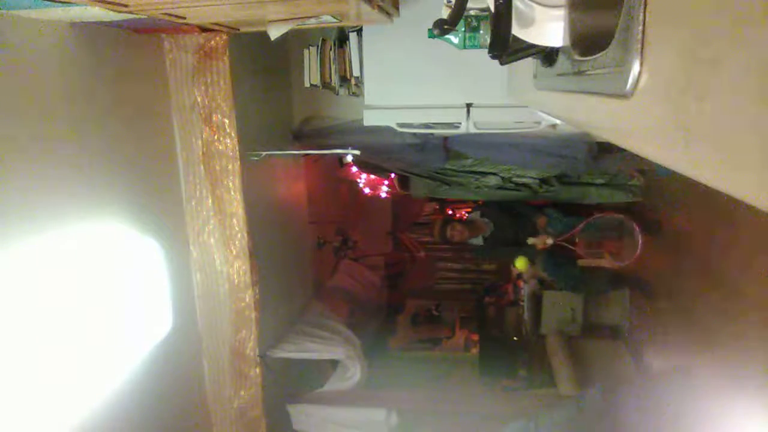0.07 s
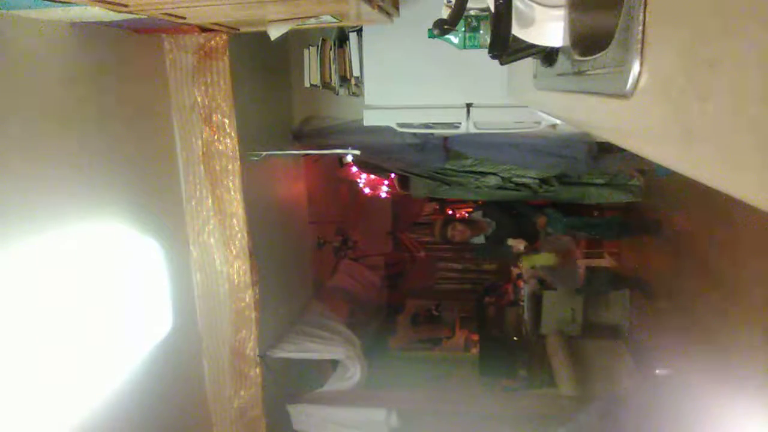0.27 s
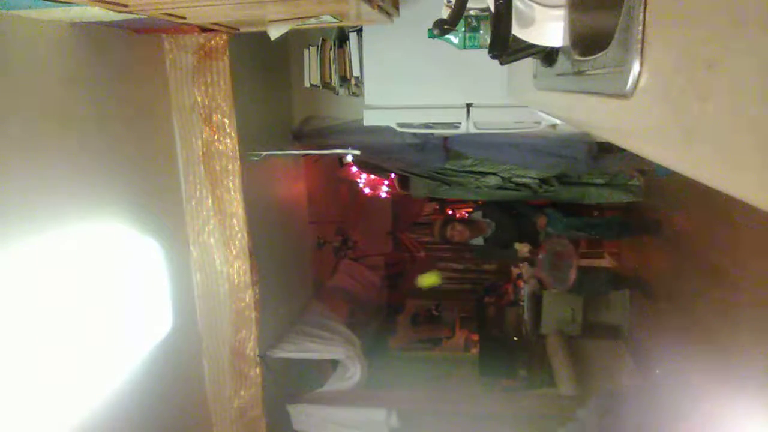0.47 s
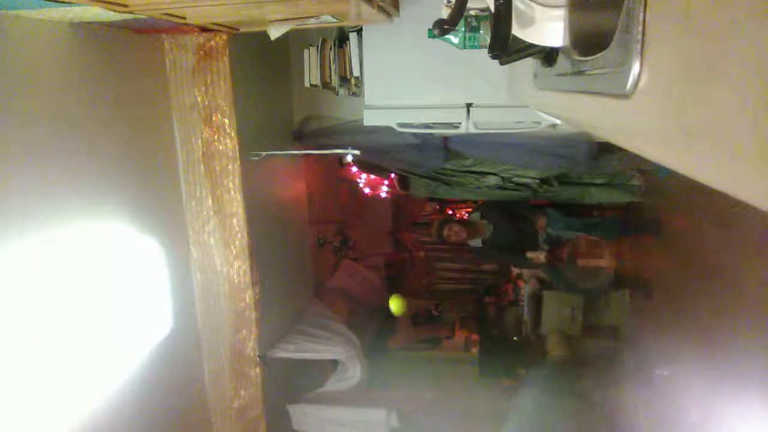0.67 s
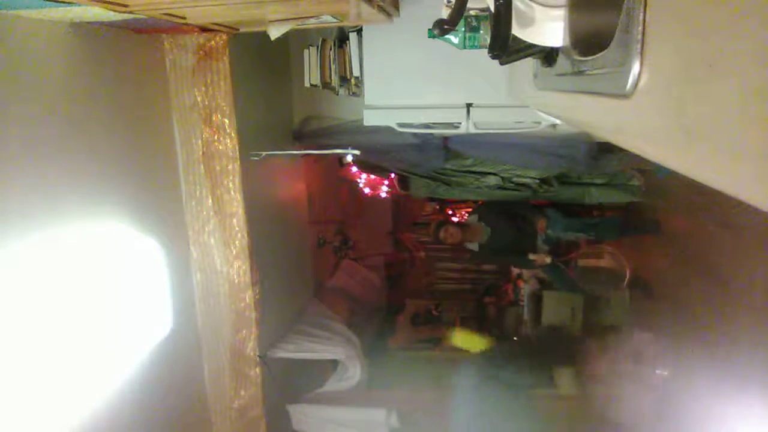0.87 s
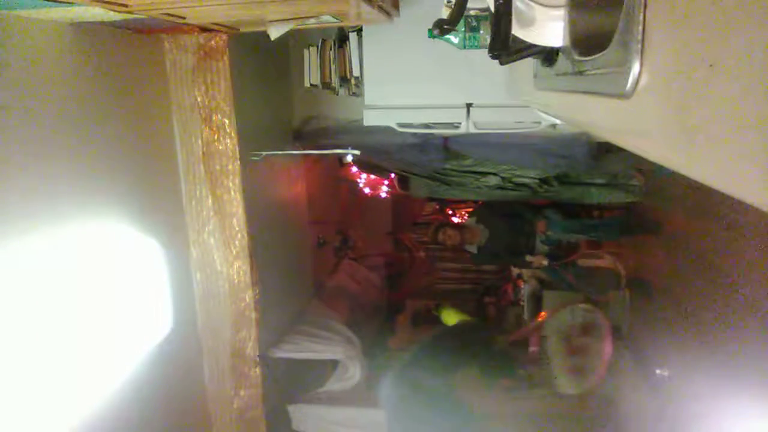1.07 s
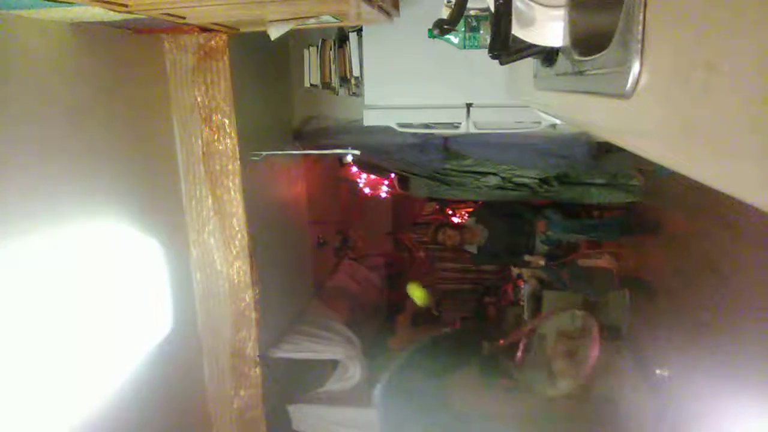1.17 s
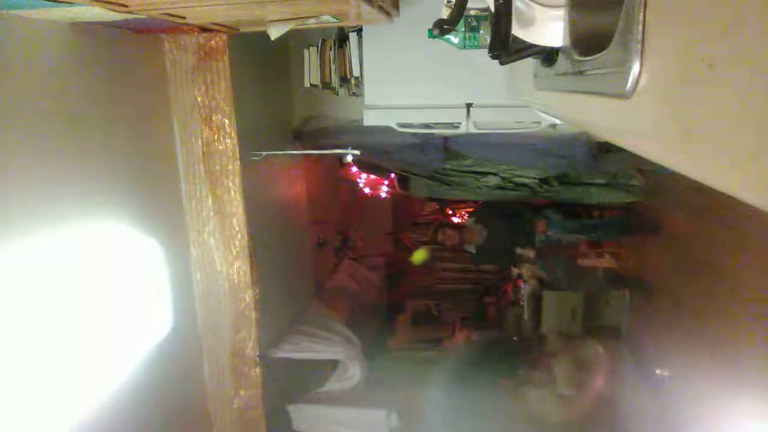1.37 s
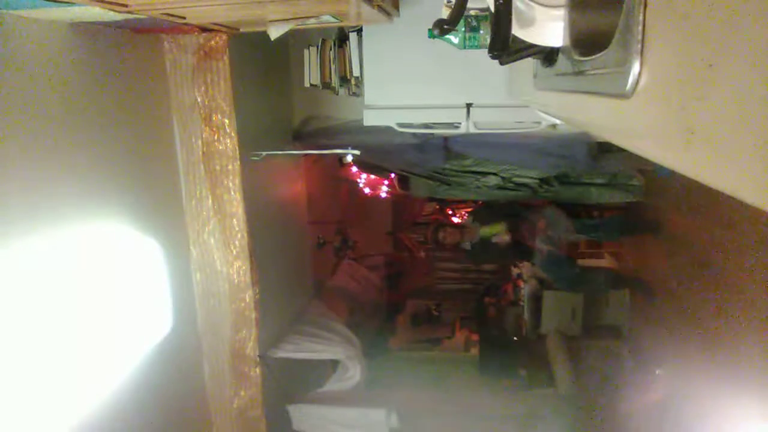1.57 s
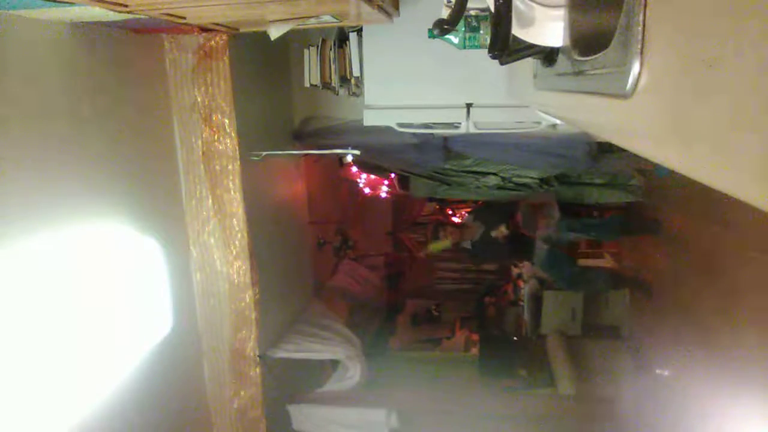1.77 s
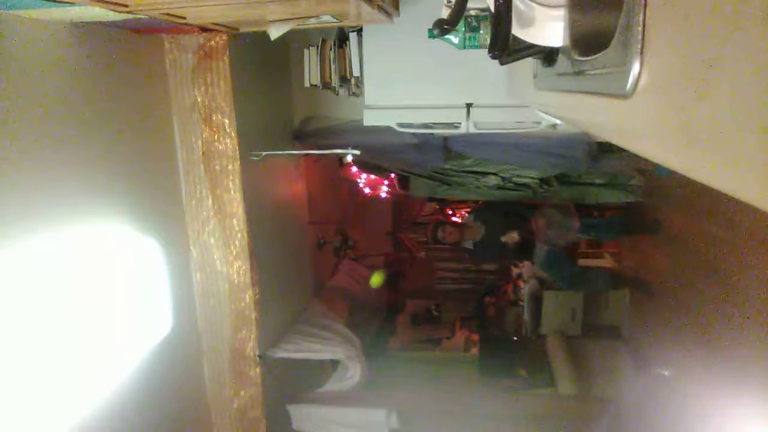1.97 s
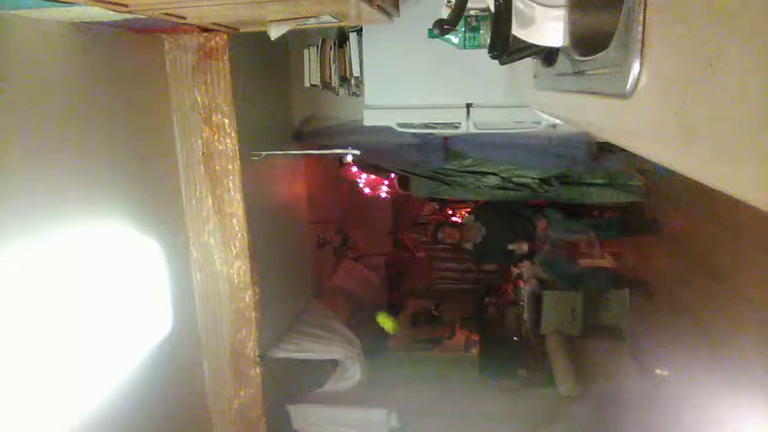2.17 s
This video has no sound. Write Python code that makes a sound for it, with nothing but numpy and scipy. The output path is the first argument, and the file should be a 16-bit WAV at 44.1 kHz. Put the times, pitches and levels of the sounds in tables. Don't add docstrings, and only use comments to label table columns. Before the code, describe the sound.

A tennis ball is played gently indoors: a soft double-touch bounce at 0.33 s, gritty shoe scuffs around 0.75 s, and a short hollow racket pock at 1.04 s. More scuffs come near 1.48 s. At 1.65 s the ball clips small metal, which rattles and rings high; it bounces at 1.71 s amid dull floor thumps until about 2.15 s. Quiet hum and airy hiss continue, with short room echoes.

```python
import sys
import numpy as np
from scipy import signal
from scipy.fft import rfft, irfft
from scipy.io import wavfile
from scipy.ndimage import uniform_filter1d

SR = 44100
rng = np.random.default_rng(int(sys.argv[2]) if len(sys.argv) > 2 else 0)


def unload_audio(sound):
    columns = np.transpose(np.atleast_2d(sound))
    steps = np.round(np.clip(columns, -1, 1) * 32767)
    wavfile.write(sys.argv[1], SR, steps.astype(np.int16))


def nominal_scale(level):
    x = np.asarray(level, float) / 20
    return 10 ** x


N = 97108

# (time [s], crack level [dB])
CLINKS = [
    (1.648, -40.5),
    (1.6555, -59.5),
    (1.659, -58.5),
    (1.669, -58),
    (1.688, -67),
    (1.712, -66.5),
]
THUMP_RISE_S = 0.017


def evened(x):
    return x / np.sqrt(np.mean(x ** 2) + 1e-20)


def read(points, hz):
    f, value = np.transpose(points)
    return np.interp(np.log(hz + 1), np.log(f + 1), value)


def add(mix, s, sound):
    part = mix[:, round(s * SR):][:, :sound.shape[1]]
    part += sound[:, :part.shape[1]]


def panned(db):
    return nominal_scale(np.array([[db], [-db]]) / 2)


def click(shape, tilt_db=0):
    hz = abs(np.fft.fftfreq(4096, 1 / SR))
    db = read(shape, hz) + tilt_db * np.log2((hz + 50) / 1200)
    log_gain = np.log(nominal_scale(np.maximum(db, -100)))
    phase = -signal.hilbert(log_gain).imag
    x = np.fft.ifft(np.exp(log_gain + 1j * phase)).real[:2048]
    return x / np.linalg.norm(x)


def ring(modes, size=16000):
    t = np.arange(size) / SR
    return sum(nominal_scale(db - 60 * t / t60) * np.sin(2 * np.pi * hz * t) for hz, db, t60 in modes)


def band(lo_hz, hi_hz, size):
    sos = signal.butter(3, [lo_hz, hi_hz], "band", fs=SR, output="sos")
    return evened(signal.sosfilt(sos, rng.standard_normal((2, size))))


def stereo_pair(left, other, same, lean):
    return np.array([lean * left, (same * left + np.sqrt(1 - same ** 2) * other) / lean])


def room(x, pan_db, dry_db, blur_s=0):
    # (frequency [Hz], likeness)
    port_same = [(130, .95), (300, .85), (600, .8), (1050, .55), (1650, .15), (2900, -.25), (6400, 0),
                 (14000, .1)]
    # (frequency [Hz], level [dB])
    port_lean = [(60, -3), (250, 3.5), (1000, 3), (2500, 0), (4700, 2), (7500, -1), (14000, -4)]
    # (frequency [Hz], t60 [s])
    decay = [(250, 0.26), (1000, 0.17), (3000, 0.16), (8000, 0.21), (13000, 0.17)]
    fill_s, hold_s = 0.003, 0.016
    shape = (2, SR // 2)
    build = np.minimum(np.arange(SR // 2) / SR / fill_s, 1)
    taps = rng.choice([-1., 1.], shape) * (rng.random(shape) < 0.1) * build
    hz, t, z = signal.stft(taps, SR, nperseg=256)
    same = np.clip(read(port_same, hz), -1, 1)[:, None]
    z = stereo_pair(z[0], z[1], same, nominal_scale(read(port_lean, hz) / 2)[:, None])
    z = z * nominal_scale(-60 * np.maximum(t - hold_s, 0) / read(decay, hz)[:, None])
    tail = signal.istft(z, SR, nperseg=256)[1]
    tail = tail / np.linalg.norm(tail) * np.sqrt(2)
    blur = np.hanning(round(blur_s * SR) + 3)
    tail[:, :len(blur)] += nominal_scale(dry_db) * blur / blur.sum()
    return signal.fftconvolve(x[None], tail, axes=1) * panned(pan_db)


def pock(shape, shell_db, db, dry_db, pan_db, tilt_db):
    # (frequency [Hz], level [dB], t60 [s])
    shell = [(858, -24.5, 0.034), (981, -28.5, 0.19), (1126, -10.5, 0.072), (1440, -12, 0.092),
             (1540, -3.5, .07), (1618, -8.5, 0.094), (2106, -19, 0.3)]
    x = click(shape, tilt_db) + nominal_scale(shell_db) * ring(shell, size=2048)
    return nominal_scale(db + 32.5) * room(x, pan_db, dry_db, blur_s=0.00015)


def racket_knock(*row):
    # (frequency [Hz], density [dB per Hz])
    ball = [(150, -18.5), (300, -10.5), (900, 1.5), (1550, -6), (2300, -8), (4000, -19.5), (8500, -34),
            (11500, -49.5)]
    return pock(ball, -25, *row)


def ball_landing(*row):
    # (frequency [Hz], density [dB per Hz])
    landing = [(200, -18.5), (450, -8), (620, 3), (1100, 2), (1700, -2.5), (2200, -14), (4500, -27),
               (14000, -46.5)]
    return pock(landing, -49, *row)


def fitting_cracks():
    # (frequency [Hz], density [dB per Hz])
    crack = [(300, -33.5), (1300, -25), (2100, -9.5), (3000, -13), (4100, -8), (7000, -14.5), (10300, -9.5),
             (14400, -25)]
    # (frequency [Hz], width [Hz], depth [dB])
    hollows = [(2964, 310, -5), (5960, 380, -10.5), (8350, 210, -14), (14500, 250, -18)]
    hits = np.zeros(4000)
    for s, db in CLINKS:
        hits[round((s - CLINKS[0][0]) * SR)] = nominal_scale(db + 37.5)
    hz = np.geomspace(200, 16000, num=400)
    colour = read(crack, hz)
    for f, width_hz, db in hollows:
        colour += db * np.exp(-((hz - f) / width_hz) ** 2)
    return room(signal.fftconvolve(hits, click(np.transpose([hz, colour]))), 0, -22)


def fitting_ring():
    metal_hz = [2180, 3761, 3955, 7798, 9283, 9353, 9468, 9521, 9610, 9841, 10247, 10430, 10570, 10950,
                11230, 13126]
    # (level [dB], t60 [s], left-right [dB], bend [1 dies evenly, 2 holds then dies ever faster])
    modes = [(-18, .11, 0, 1), (-16, .12, 4, 1), (-17, .1, 4, 1), (-27, .2, 0, 1), (-15, .3, -2, 1),
             (-8.5, .27, -2, 1.35), (-17, .18, -2, 2), (-4, .215, -1, 2), (-20, .17, -2, 2),
             (-8, .16, -4, 1.5), (-9, .09, -10, 1), (-9, .1, -10, 1), (-15, .1, -9, 1), (-17, .13, -9, 1),
             (-22, .06, -6, 1), (-25, .13, -3, 1)]
    rise_s = [
        [.014],
        [.005],
    ]
    fizz_hz = (12270, 14300)
    ring_db, wet_db, fizz_db, fizz_s = -27, -13, -76, 0.37
    t = np.arange(16000) / SR
    rise, out = 1 - np.exp(-t / np.array(rise_s)), np.zeros((2, len(t)))
    for hz, (db, t60, pan_db, bend) in zip(metal_hz, modes):
        lead = 1.55 + rng.standard_normal() / 2
        turn = 2 * np.pi * rng.random() + np.array([[lead], [0]])
        level = nominal_scale(ring_db + db - 60 * (t / t60) ** bend) * panned(pan_db)
        out += level * rise * np.sin(2 * np.pi * hz * t + turn)
    fizz = nominal_scale(fizz_db) * band(*fizz_hz, len(t)) * rise * np.clip((fizz_s - t) / 0.14, 0, 1)
    return out + fizz + nominal_scale(wet_db) * room(out.mean(0), -4, -40)[:, :len(t)]


def scuff(swell_s, swell_db, snap_db, pan_db):
    # (frequency [Hz], density [dB per Hz])
    sole_shape = [(1800, -23.5), (3300, -3.5), (4500, -14), (5500, -3.5), (7200, 1.5), (8600, -4.5),
                  (10500, -6.5), (14300, -18.5)]
    shade_hz = (8000, 10500)
    grit_per_s, grit_db, grit_dry_db = 9000, 2.5, -14
    snap_s, snap_wet_db = 0.0069, -8.5
    u = np.linspace(0, 1, round(swell_s * SR))
    grit, spread, burst = rng.standard_normal((3, len(u)))
    sparse = rng.random(len(u)) < grit_per_s / SR
    slide = nominal_scale(swell_db + 15) * u * grit * nominal_scale(grit_db * abs(spread)) * sparse
    snap_rise = np.clip(1 - (1 - u) * swell_s / snap_s, 0, 1)
    snap = nominal_scale(snap_db + snap_wet_db + 9.5) * burst * snap_rise
    sole = click(sole_shape)
    x = room(signal.fftconvolve(slide, sole), 0, grit_dry_db)
    x = x + room(signal.fftconvolve(snap, sole), 0, -snap_wet_db)
    treble = np.interp(np.fft.rfftfreq(x.shape[1], 1 / SR), shade_hz, [0, 1])
    return irfft(rfft(x) * nominal_scale(np.array([[pan_db], [-pan_db]]) / 2 * treble), x.shape[1])


def soft_push(size):
    return np.sin(np.pi / 2 * np.minimum(np.arange(size) / SR / THUMP_RISE_S, 1)) ** 2


def thump(boom_db, board_db, creak_db, share):
    # (frequency [Hz], level [dB], t60 [s])
    boom = [(54, -1, 0.53)]
    # (frequency [Hz], level [dB], t60 [s])
    board = [(104.7, 3, 0.31), (121.6, 3, 0.18)]
    # (frequency [Hz], level [dB], t60 [s])
    creak = [(223, 5, 0.095), (300, 7.5, 0.11), (429, -3, 0.1)]
    x = 0
    for db, modes in ((boom_db, boom), (board_db, board)):
        x = x + nominal_scale(db) * ring([(hz, d, t60 * share) for hz, d, t60 in modes])
    lean = panned(-4.5)
    return soft_push(len(x)) * (x * lean + nominal_scale(creak_db) * ring(creak) / lean)


def tock(hz, db, t60):
    x = ring([(hz, db, t60)])
    return x * soft_push(len(x)) * panned(3)


def steady(shape, db, patchy_db, size):
    # (frequency [Hz], left-right likeness)
    likeness = [(60, 1), (230, 0.93), (920, 0.64), (3580, 0.023), (14000, 0.017)]
    # (frequency [Hz], left-right level [dB])
    side = [(60, 2.5), (230, -1), (920, 2.5), (3580, 0), (14000, -3.5)]
    frames, hz = 4 * N // size + 5, np.fft.rfftfreq(size, 1 / SR)
    a, b, c, d, patches = rng.standard_normal((frames, len(hz), 5)).T
    patches = uniform_filter1d(uniform_filter1d(patches, size=12, axis=0), size=8, axis=1)
    same = np.clip(read(likeness, hz), -1, 1)[:, None]
    z = stereo_pair(a + 1j * b, c + 1j * d, same, nominal_scale(read(side, hz) / 2)[:, None])
    z = z * nominal_scale(read(shape, hz)[:, None] + patchy_db * evened(patches))
    return nominal_scale(db) * evened(signal.istft(z, nperseg=size, noverlap=3 * size // 4)[1][:, :N])


def house_hum():
    # (frequency [Hz], density [dB per Hz])
    hum = [(30, -30), (54, 9.5), (78, -29), (115, 1), (160, -20), (300, -17.5), (450, -17.5), (700, -58.5)]
    return steady(hum, -66, patchy_db=4.5, size=2048)


def room_air():
    # (frequency [Hz], density [dB per Hz])
    air = [(180, -35.5), (300, -2), (347, -32.5), (488, -6), (622, -4.5), (875, -2), (949, -5), (1650, -12),
           (14500, -28.5)]
    return steady(air, -73, patchy_db=1.5, size=1024)


def appliance_whistle():
    # (frequency [Hz], half width [Hz], level [dB], start [s], end [s])
    whistle = (4698, 150, -86, -6, -3.5)
    hz, width_hz, db, start, end = whistle
    t = np.arange(N) / SR
    fade = np.clip(np.minimum(t - start, end - t) / 0.064, 0, 1)
    return nominal_scale(db) * band(hz - width_hz, hz + width_hz, N) * fade


def scene():
    # (time [s], level [dB], direct [dB], left-right [dB], brightness [dB per octave])
    knocks = [
        (1.040, -48.5, -14, 6.5, 0.5),
        (1.0432, -42.5, -8, -2.5, 3),
    ]
    # (time [s], level [dB], direct [dB], left-right [dB], brightness [dB per octave])
    bounces = [
        (.329, -51.5, -14.5, -3, 0.7),
        (.347, -56, 0, 3.5, 2.5),
        (1.713, -47.5, -15.5, -0.5, 4.5),
        (1.732, -52, -14, 6.5, 1.9),
    ]
    # (snap time [s], swell [s], swell level [dB], snap level [dB], treble left-right [dB])
    scuffs = [
        (0.738, 0.0062, -73, -79, -13),
        (.767, 0.027, -66.5, -64.5, -9.5),
        (0.884, 0.013, -109, -85, -27),
        (1.273, 0.011, -103, -87, -12),
        (1.462, 0.0094, -74.5, -86, -21),
        (1.482, 0.015, -80.5, -71.5, -14.5),
        (1.489, 0.04, -74, -69.5, -7),
    ]
    # (time [s], boom [dB], board [dB], creak [dB], share of free ring time)
    thumps = [(0.224, -76, -64, -70, 1), (0.29, -69, -72, -60.5, .6), (0.305, -80, -77, -54.5, 0.5),
              (0.389, -74, -60.5, -67, .8), (0.54, -71, -65, -62.5, .8), (0.629, -91, -55, -65.5, 0.39),
              (0.647, -79, -61, -81, 0.34), (0.698, -97, -58, -65.5, 0.61), (0.714, -84, -57.5, -78, 0.68),
              (0.772, -56, -84, -62.5, 0.3), (0.938, -75, -58.5, -90, 0.46), (1.039, -75, -80, -54.5, 0.48),
              (1.661, -67, -86, -52.5, 0.94), (1.713, -49.5, -49, -69, 0.66), (1.728, -68, -43, -65, 0.97),
              (1.745, -57, -42.5, -72, 0.72), (1.766, -62, -41.5, -58, 0.32),
              (1.791, -37.5, -64, -62.5, 0.84), (1.835, -46, -43.5, -78, 0.45),
              (1.904, -47.5, -42, -74, 0.43), (1.947, -55, -39, -70, .35), (1.985, -57, -57, -74, 1),
              (2.035, -41.5, -41.5, -77, 0.33), (2.067, -62, -42.5, -64.5, 0.34),
              (2.112, -70, -60.5, -81, 0.74), (2.172, -63.5, -59, -74, 0.98)]
    # (time [s], pitch [Hz], level [dB], t60 [s])
    tocks = [(.225, 478, -63, .1), (.3, 396, -55, 0.17), (0.331, 208, -64, .1), (.56, 382, -62, .1),
             (0.626, 171, -55, 0.18), (.66, 760, -68, 0.33), (0.741, 190, -66, 0.12), (1.0, 201, -62, .1),
             (1.49, 875, -64, 0.14), (1.723, 191, -39, 0.075), (1.743, 237, -46, 0.11),
             (1.774, 273, -63, 0.08), (1.879, 405, -60, .12), (1.917, 206, -52, 0.058),
             (2.011, 393, -64.5, 0.15), (2.074, 300, -63, 0.07)]
    mix = house_hum() + room_air() + appliance_whistle()
    for s, *row in knocks:
        add(mix, s, racket_knock(*row))
    for s, *row in bounces:
        add(mix, s, ball_landing(*row))
    add(mix, CLINKS[0][0], fitting_cracks())
    add(mix, 1.648, fitting_ring())
    for s, swell_s, *row in scuffs:
        add(mix, s - swell_s, scuff(swell_s, *row))
    for s, *row in thumps:
        add(mix, s, thump(*row))
    for s, *row in tocks:
        add(mix, s, tock(*row))
    return mix


def low_pass(x):
    return signal.sosfilt(signal.butter(12, 14610, fs=SR, output="sos"), x)


def record(dry):
    low_cut = signal.butter(4, 41, "high", fs=SR, output="sos")
    edge = signal.firwin(511, 14300, window=("kaiser", 9), fs=SR)
    mix = signal.oaconvolve(signal.sosfilt(low_cut, dry), edge[None], "same")
    return low_pass(mix)


dry = scene()
out = record(dry)
unload_audio(out)
```